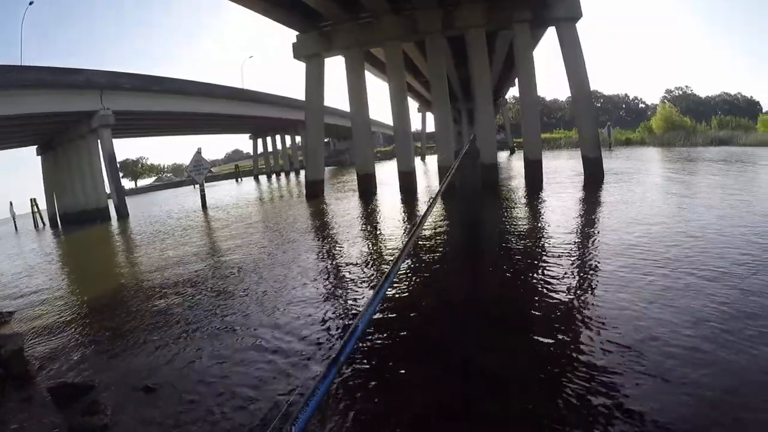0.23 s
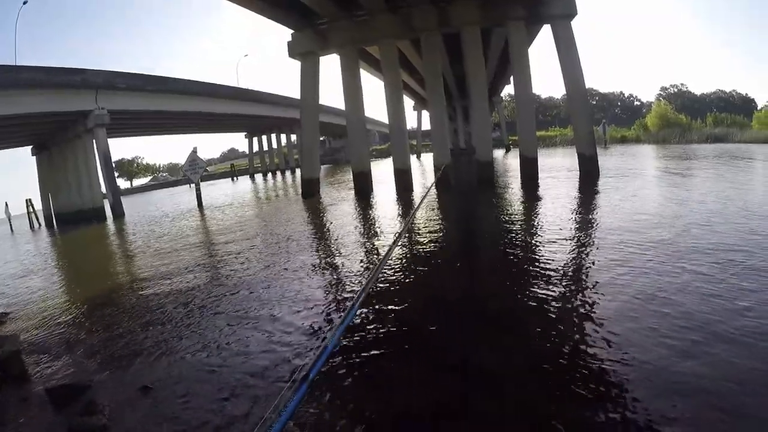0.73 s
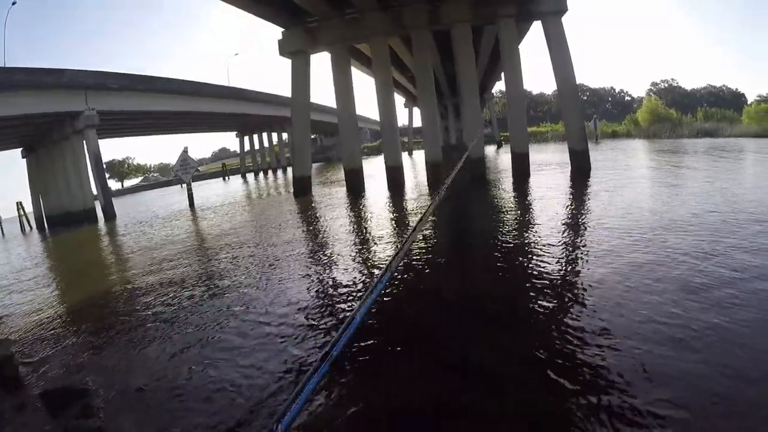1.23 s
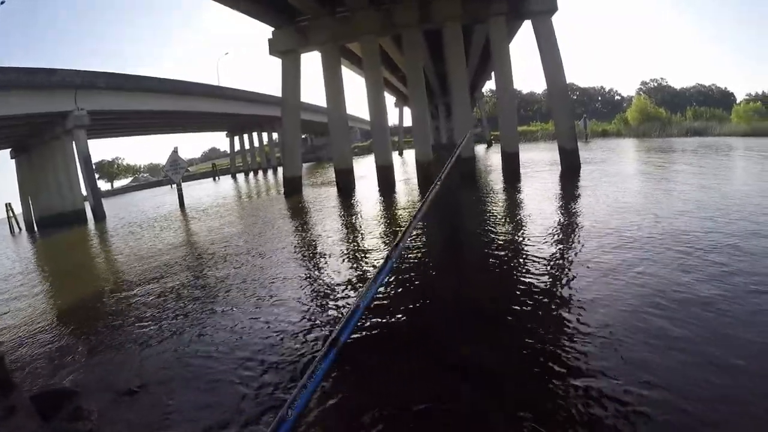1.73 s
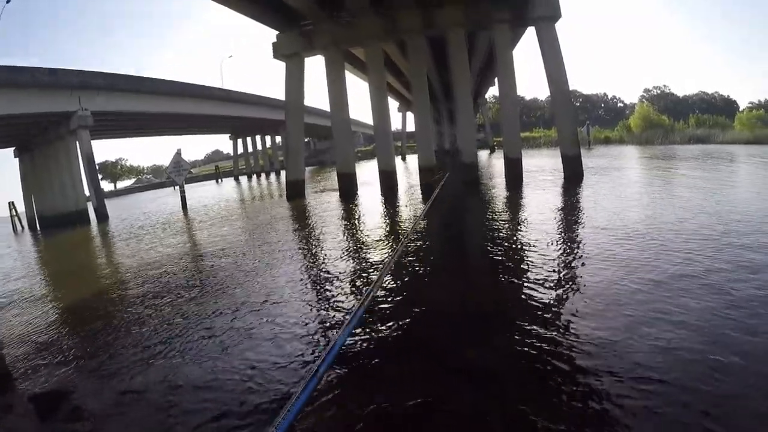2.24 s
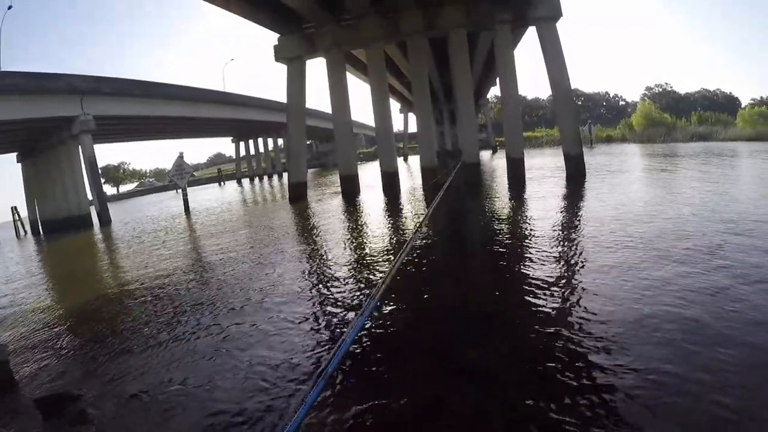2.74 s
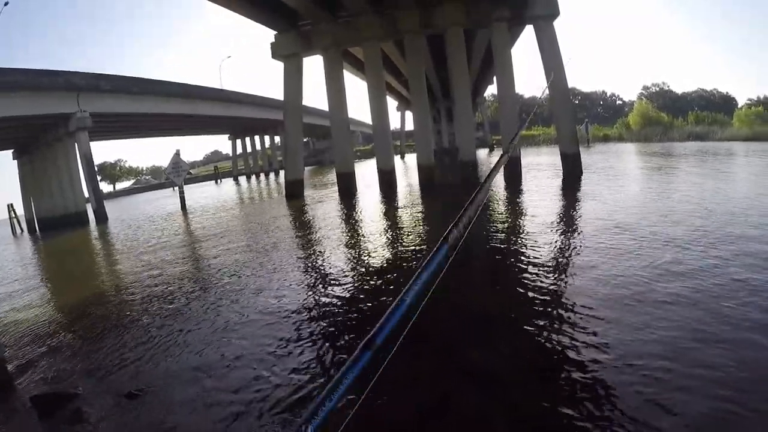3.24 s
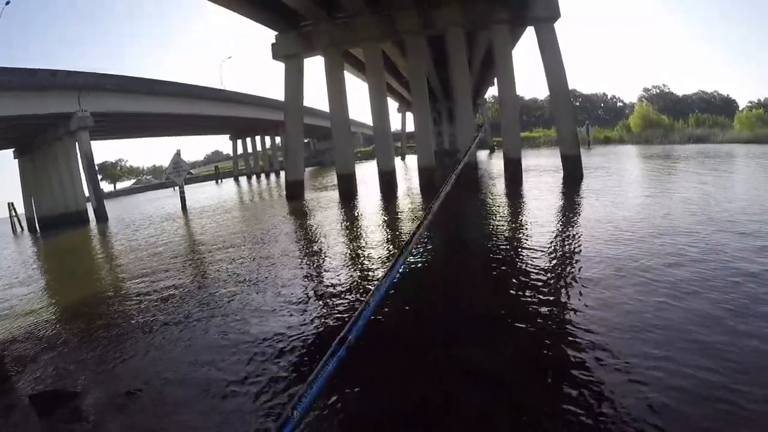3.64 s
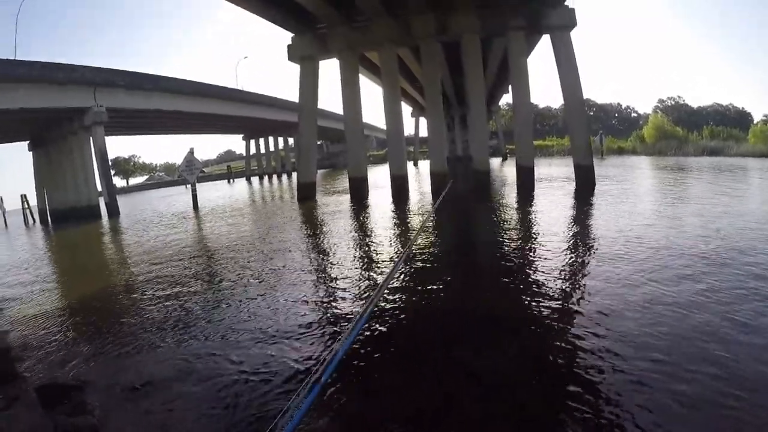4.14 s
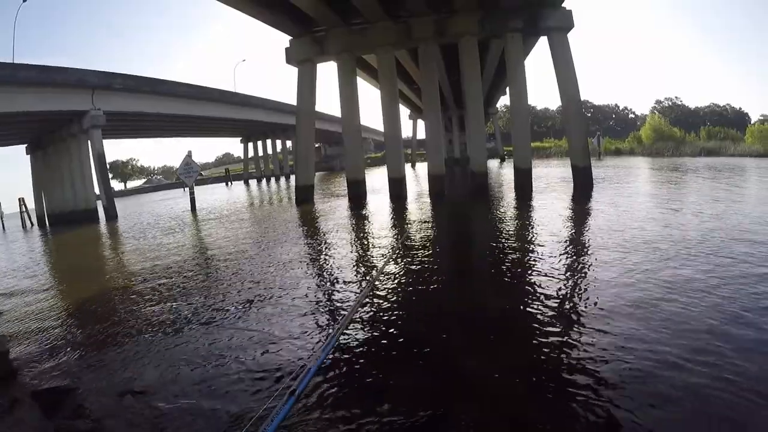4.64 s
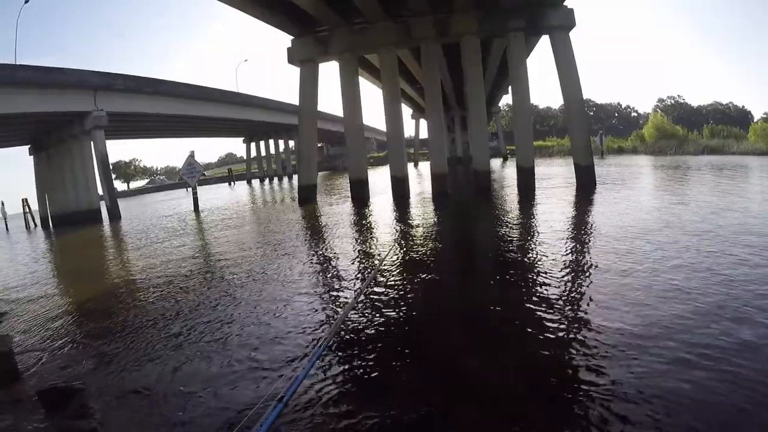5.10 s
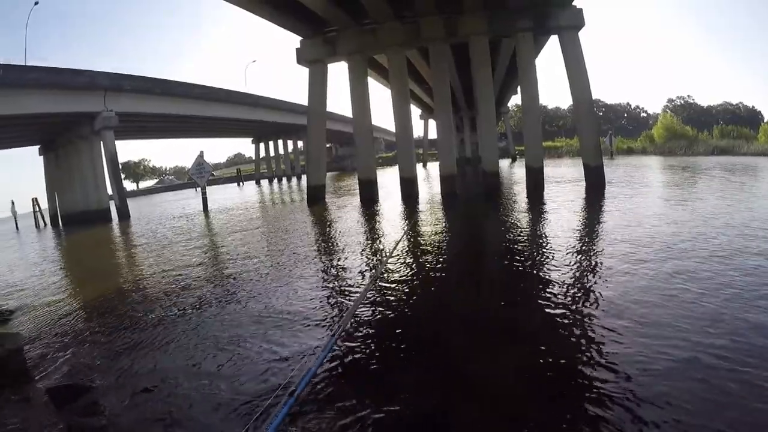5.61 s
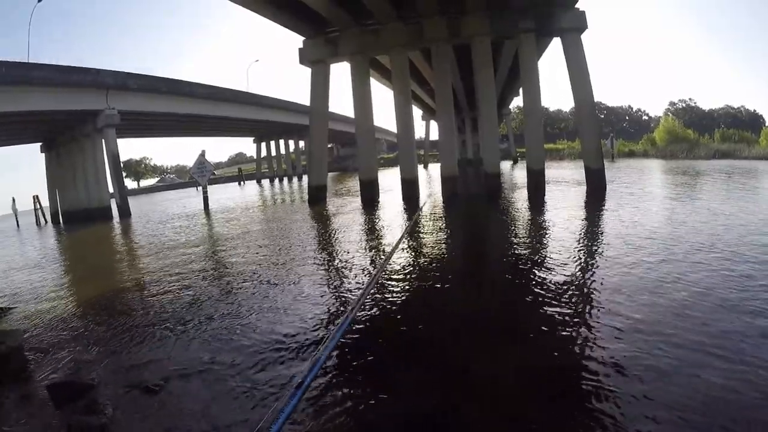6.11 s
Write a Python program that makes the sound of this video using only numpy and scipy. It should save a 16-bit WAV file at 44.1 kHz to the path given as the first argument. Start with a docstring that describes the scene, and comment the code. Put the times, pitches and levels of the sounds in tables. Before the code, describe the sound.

From under a concrete road bridge beside a river, a continuous low traffic rumble fills all six seconds or so, dark and slightly stronger on the left, with the deck humming around it and steady engine drones. Wind buffets the exposed stereo microphone in dull lumps: a strong thump at 0.2 s, another near 0.9, then weaker ones around 2, 3.2 and 5.3. A small wave plips and ticks at about 0.9 s. A vehicle's engine note grows, peaks near 2.9, drops in pitch by 3.6, then lifts and disappears by 4.5. A faint thin whine near 1.1 kHz softens after 3.2. Bubbles pop around 3.1 and 3.8, a fizzing splash comes at 4.3 to 4.7, and from 5.5 to the end lapping is busiest, with a round plop at 5.7 and climbing bloops near 6.2. Another low engine slowly nears; faint fluttering insect hiss persists.

```python
"""Traffic on a concrete road bridge rumbles overhead: shaped noise, a humming deck and gliding engine notes.
Below it by the river, a thin whine slowly fades and lumpy low noise makes gusts on two microphone ports.
Insects are narrow bands of hiss with a fast beat.
Small waves bring plips and bloops (sines that climb), ticks (short noise bursts) and a fizz of tiny grains."""
import sys
import numpy as np
from scipy import signal
from scipy.fft import rfft, irfft, next_fast_len
from scipy.io import wavfile
from scipy.ndimage import uniform_filter1d

SR = 44100
rng = np.random.default_rng(int(sys.argv[2]) if len(sys.argv) > 2 else 0)


def gain_from_decibels(decibels):
    """Convert decibel values to linear amplitude factors."""
    exponent = np.asarray(decibels, float) / 20
    return 10 ** exponent


def dump_mix(stems):
    """Bounce the given channels to the path in sys.argv[1] as a 16-bit WAV at rate SR."""
    frames = np.atleast_2d(stems).T  # one column per channel
    limited = np.clip(frames, -1, 1)  # hard clip at full scale
    pcm = np.round(limited * 32767).astype(np.int16)
    wavfile.write(sys.argv[1], SR, pcm)


N = 280476  # length in samples
TIME = np.arange(N) / SR  # seconds
LONG = next_fast_len(N, real=True)  # a length that transforms quickly
HZ = np.fft.rfftfreq(LONG, 1 / SR)

# How loud and near the traffic is.
# Each row: time in seconds, change of level in dB, change of brightness in dB.
TRAFFIC = [(0, -2, 3.5), (2.5, -1.5, 2), (5.3, -2, 5.5), (6.36, -1, 4)]
# How much stronger the left port hears. Each row: frequency in Hz, left over right in dB.
BALANCE_DB = [(60, 3.5), (950, 4), (2400, 1.5), (6000, -2.5), (15000, 2)]
# How far the left port is ahead. Each row: frequency in Hz, lead of the left in radians.
LEAD = [(60, .03), (1000, 0.25), (2400, 0.11), (3700, 3.16), (6100, 5.04), (9700, 7.8), (15000, 9)]


def evened(x):
    """Scales a sound to an rms of one."""
    return x / np.sqrt(np.mean(x ** 2, axis=-1, keepdims=True) + 1e-20)


def read(points, hz):
    """Reads a curve between its points, along a log-frequency axis."""
    f, value = np.transpose(points)
    return np.interp(np.log(hz + 1), np.log(f + 1), value)


def slow(rate):
    """Slow random wandering of rms one: sines from an eighth of rate up to rate, in Hz."""
    coarse = TIME[::256]
    waves = np.zeros(len(coarse))
    for f in np.geomspace(rate / 8, rate, num=16):
        waves += np.sin(2 * np.pi * (f * coarse + rng.random())) / np.sqrt(f)
    return np.interp(TIME, coarse, evened(waves))


def sides(pan_db):
    """Left and right gains for a level difference, left over right in dB."""
    return gain_from_decibels(np.array([pan_db / 2, -pan_db / 2]))


def spectra(count):
    """Random spectra of white noise on the long frequency grid."""
    shape = (count, len(HZ))
    return rng.standard_normal(shape) + 1j * rng.standard_normal(shape)


def ports(first, other):
    """One wide sound field at both ports: two unrelated spectra, shared more at low pitch, right one late."""
    # How alike the ports are. Each row: frequency in Hz, likeness from 0 to 1.
    likeness = [(60, 0.92), (300, 1), (800, 1), (1500, 0.51), (3000, 0.34), (15000, 0.044)]
    hz = np.linspace(0, SR / 2, first.shape[-1])
    same = np.clip(read(likeness, hz), 0, 1)
    blend = same * first + np.sqrt(1 - same ** 2) * other
    right = blend * np.exp(-1j * read(LEAD, hz))
    return np.array([first, right])


def near(x):
    """One clear source at both ports: the same sound, shifted in phase and balanced by frequency."""
    left = rfft(x, LONG)
    right = left * np.exp(-1j * read(LEAD, HZ))
    pair = np.array([left, right]) * sides(read(BALANCE_DB, HZ))
    return irfft(pair, LONG)[:, :N]


def narrow(modes):
    """Noise ringing in steep resonances (Hz, width Hz, rms dB), at both ports."""
    power = np.zeros(len(HZ))
    for hz, width, db in modes:
        peak = 1 / (1 + (2 * (HZ - hz) / width) ** 2) ** 2
        power += gain_from_decibels(db) ** 2 * peak ** 2 / np.sum(peak ** 2)
    pair = ports(*spectra(count=2)) * np.sqrt(power) * LONG / 2
    return irfft(pair, LONG)[:, :N]


def tones(lines, drift_hz, waver_db):
    """Sines (Hz, dB) that drift in pitch and waver in strength."""
    out = np.zeros(N)
    for hz, db in lines:
        strength = np.sqrt(2) * gain_from_decibels(db + waver_db * slow(4.6))
        turns = np.cumsum(hz + drift_hz * slow(4)) / SR
        out += strength * np.sin(2 * np.pi * turns)
    return out


def roar():
    """Tyre and engine roar: wide noise in drifting patches; nearer vehicles add treble."""
    # Tone colour of the roar. Each row: frequency in Hz, relative level in dB per Hz.
    colour = [(35, -32), (60, -8.5), (100, -3), (300, -5.5), (500, -17.5), (780, -28.5), (1200, -31),
              (1900, -38.5), (3000, -38.5), (6000, -48.5), (8000, -53), (10500, -58.5), (15500, -78)]
    frames, hz = N // 256 + 5, np.fft.rfftfreq(1024, 1 / SR)
    a, b, c, d, patches = np.moveaxis(rng.standard_normal((frames, 513, 5)), 2, 0)
    # smooth over time, then over frequency
    patches = uniform_filter1d(uniform_filter1d(patches, 10, axis=0), 8, axis=1)
    s, _, bright_db = np.transpose(TRAFFIC)
    bright_db = np.interp(np.arange(frames) * 256 / SR, s, bright_db)
    # brightness grows above 350 Hz and eases off above 4500 Hz
    share = np.clip(np.log2(hz / 350 + 1e-9), 0, 1) / (1 + (hz / 4500) ** 2)
    shape_db = read(colour, hz) + 1.63 * patches / patches.std() + np.outer(bright_db, share)
    balance = sides(read(BALANCE_DB, hz))[:, None]
    z = ports(a + 1j * b, c + 1j * d) * gain_from_decibels(shape_db) * balance
    x = signal.istft(z.swapaxes(1, 2), nperseg=1024, noverlap=768)[1][:, :N]
    return gain_from_decibels(-24.5) * x / x.std()


def deck():
    """Passing wheels shake the concrete: noise in its broad resonances, around a humming set of tones."""
    # Broad resonances of deck and girders. Each row: frequency in Hz, width in Hz, level in dB.
    resonances = [(105.2, 46, -31), (288, 42, -41.5)]
    # Humming tones in the deck. Each row: frequency in Hz, level in dB.
    hum = [(106, -29.5), (171, -30), (352, -41.5)]
    shaking = narrow(resonances) * sides(1.8)[:, None]
    return shaking + near(tones(hum, drift_hz=0.77, waver_db=0.0))


def engines():
    """Engine notes: sines that follow the speed and waver a little; the drone sounds at multiples."""
    # A vehicle that passes, slows and pulls away. Each row: time in seconds, pitch in Hz, level in dB.
    passing = [(1, 309.6, -50), (2.2, 301.8, -40), (2.902, 294.6, -32.5), (3.602, 264.5, -45),
               (4.25, 288, -38), (4.5, 293, -58)]
    # A low note drawing nearer. Each row: time in seconds, pitch in Hz, level in dB.
    nearing = [(0, 116.5, -41), (4, 115.4, -35.5), (6.36, 118.3, -28.5)]
    # A steadily loaded engine. Each row: time in seconds, base pitch in Hz.
    drone = [(0, 76.7), (3.7, 77), (4, 78.4), (4.9, 78.3), (5.2, 76.8), (6.36, 77.2)]
    # Its audible tones. Each entry: multiple of the base pitch, level in dB.
    multiples = {3: -32.5, 4: -33}
    moving = []
    for path in (passing, nearing):
        s, hz, db = np.transpose(path)
        moving.append((np.interp(TIME, s, hz), np.interp(TIME, s, db)))
    base_hz = np.interp(TIME, *np.transpose(drone))
    steady = [(k * base_hz, db) for k, db in multiples.items()]
    sound = tones(moving, drift_hz=0.49, waver_db=-1.0) + tones(steady, drift_hz=1.1, waver_db=1.1)
    return near(sound)


def whine():
    """A close thin whine: wavering sines in a fuzzy band of noise that slowly fade."""
    # Its thin tones. Each row: frequency in Hz, level in dB.
    thin = [(1027, -58), (1098, -57), (1125, -53)]
    # The fuzzy band around them. Each row: frequency in Hz, width in Hz, level in dB.
    fuzz = [(1144, 140, -55)]
    # How it fades. Each row: time in seconds, change of level in dB.
    fade = [(0, 0), (3.2, 0), (3.8, -6), (6.36, -8)]
    sound = tones(thin, drift_hz=1.77, waver_db=3.0) + narrow(fuzz)[0]
    return near(sound * gain_from_decibels(np.interp(TIME, *np.transpose(fade))))


def wind():
    """Gusts on the ports: lumpy pressure, mostly unrelated at the two, pushing harder than it pulls."""
    # The gusts. Each row: time in seconds, level in dB of both ports averaged into one, left over right in dB.
    gusts = [(0.0, -22.5, 35), (0.18, -10, -2.5), (0.28, -22, -12.5), (0.85, -14.5, 7.5), (1.17, -18, 14.5),
             (1.74, -19.5, 13.5), (1.84, -28.5, -3), (2.04, -16.5, 9.5), (2.36, -29, 18), (2.6, -21, 7),
             (2.78, -29, 3), (3.2, -18.5, 6), (4.0, -28, 21), (4.42, -23, 21), (4.57, -31.5, 1),
             (5.28, -18, 10), (5.501, -26, -5), (6.36, -33, 21)]
    # Tone colour of the buffeting. Each row: frequency in Hz, relative level in dB per Hz.
    colour = [(8, -26), (18, 7.5), (32, -0.5), (60, -3.5), (120, -18), (260, -27.5), (700, -97)]
    s, level_db, pan_db = np.transpose(gusts)
    push = evened(irfft(spectra(count=2) * gain_from_decibels(read(colour, HZ)), LONG)[:, :N])
    push = push + 0.082 * push[::-1]  # a little of each port's buffeting is shared with the other
    push = push * gain_from_decibels(0.79 * np.array([slow(11), slow(4.1)]))
    push = push + 0.098 * (push ** 2 - 1)  # strengthens the pushes
    left, right = sides(np.interp(TIME, s, pan_db))
    balance = [left, right] / (np.hypot(left, right) / 2)
    return evened(push) * gain_from_decibels(np.interp(TIME, s, level_db)) * balance


def insects():
    """Many singers blur into bands of hiss; the nearest beats through."""
    # The choruses. Each row: frequency in Hz, width in Hz, level in dB before the beating,
    # beat depth from 0 to 1, left over right in dB.
    choruses = [(9730, 1000, -56.5, 0.45, -8), (9470, 1970, -58, 0.11, -4), (6850, 320, -65, 0, 1.5)]
    beats_per_s = 69.2
    out = np.zeros((2, N))
    for hz, width, db, depth, pan_db in choruses:
        turns = beats_per_s * TIME + 0.12 * slow(1.8)  # the beat is slightly uneven
        beat = 1 + np.clip(depth, 0, 1) * np.cos(2 * np.pi * turns)
        waver = gain_from_decibels(0.12 * slow(0.16))
        out += narrow([(hz, width, db)]) * beat * waver * sides(pan_db)[:, None]
    return out


def lapping():
    """Strength of the fizz: each wave rises fast and drains slowly over calm ripples."""
    # Small waves breaking on the bank. Each row: time of the crest in seconds, level of the fizz in dB.
    crests = [(.25, -47), (.94, -39.5), (1.73, -47.5), (3.0, -48), (4.34, -38), (4.72, -42.5), (5.1, -47),
              (5.569, -39), (5.7, -38), (6.05, -39.5), (6.24, -38.5)]
    rise_db_per_s, fall_db_per_s, calm_db = 161, 63, -61.5
    s, db = np.transpose(crests)[:, :, None]
    coarse = TIME[::256]
    since = coarse - s
    waves = gain_from_decibels(db + np.where(since < 0, rise_db_per_s, -fall_db_per_s) * since)
    strength = np.sqrt(gain_from_decibels(calm_db) ** 2 + (waves ** 2).sum(axis=0))
    return np.interp(TIME, coarse, strength)


def plip(hz, t60, rise):
    """A bubble: a sine dying 60 dB in t60 seconds, its pitch climbing by twice the share rise meanwhile."""
    t = np.arange(4096) / SR
    wave = np.sin(2 * np.pi * hz * t * (1 + rise * t / t60))
    soft_start = 1 - np.exp(-t / t60 / 0.042)
    return wave * gain_from_decibels(-60 * t / t60) * soft_start


def fizz():
    """A random patter of tiny bubbles and snaps, in clumps; a few are larger."""
    clumps = gain_from_decibels(4.0 * slow(40))
    happens = rng.random(N) < 2000 * clumps / SR  # 2000 grains a second, thinned or crowded by the clumps
    size = gain_from_decibels(3.6 * np.minimum(rng.exponential(1, N), 4)) * happens
    kind, out = rng.integers(0, 32, N), np.zeros(N)
    for k, hz in enumerate(np.geomspace(750, 11000, num=32)):
        cycles = 26 if k % 2 else 8  # bubbles ring, snaps do not
        grain = plip(hz, cycles / hz, 0.15)[:1024]
        grain = grain * gain_from_decibels(-3 * np.log2(hz / 3000))  # 3 dB weaker per octave upwards
        out += signal.oaconvolve(size * (kind == k), grain)[:N]
    return evened(out) * lapping()


def tick(hz, octaves, lag_us, noise):
    """A bursting droplet: a brief noise with a weak tail, coloured around one pitch, heavier below it."""
    t, f = np.arange(1024) / SR, np.fft.rfftfreq(1024, 1 / SR)
    decay = np.exp(-t / 0.0012) + 0.16 * np.exp(-t / 0.007)
    burst = np.roll(noise * decay, 64)  # leaves room ahead of the burst
    above = np.log2(f / hz + 1e-9)  # octaves above the pitch
    snap = rfft(burst) * np.exp(-0.25 * (above / octaves) ** 2) * gain_from_decibels(-4 * above)
    left = snap * np.exp(-2j * np.pi * f * lag_us / 10 ** 6)
    pair = irfft([left, snap]) * sides(-2.8)[:, None]
    return pair / abs(irfft(snap)).max()


def bloop(hz, length, octaves):
    """A shrinking pocket of air: a broken sine that climbs ever faster."""
    u = np.arange(0, length, 1 / SR) / length  # from 0 to 1 over the sound
    turns = np.cumsum(hz * 2 ** (octaves * u ** 1.7)) / SR
    broken = 1 + 0.25 * evened(uniform_filter1d(rng.standard_normal(len(u)), size=150))
    fade = gain_from_decibels(-8.5 * u) * np.sqrt(np.sin(np.pi * u))
    return np.sin(2 * np.pi * turns) * broken * fade


def add(mix, s, sound):
    """Adds a short sound into the mix, starting at s seconds."""
    part = mix[round(s * SR):][:len(sound)]
    part += sound[:len(part)]


def water():
    """Plips, bloops and ticks among the fizz, with a second, wide-sounding fizz behind them."""
    # Bubbles left by small waves. Each row: start in seconds, level in dB, pitch in Hz,
    # time to die by 60 dB in seconds.
    plips = [(0.281, -27, 960, 0.061), (0.917, -17, 1200, 0.0079), (0.967, -34, 890, 0.03),
             (.992, -32, 2200, .015), (3.078, -30, 1490, 0.013), (3.717, -27, 1700, 0.02),
             (3.808, -32.5, 2550, 0.024), (3.856, -21, 1430, 0.031), (4.337, -28, 2560, 0.014),
             (4.401, -21.5, 836, 0.012), (4.611, -21.5, 1220, 0.023), (5.553, -31, 2030, .02),
             (5.565, -27.5, 1120, 0.025), (5.567, -30, 2600, .018), (5.669, -20.5, 2460, 0.022),
             (5.684, -24, 4250, .012), (5.705, -11.5, 736, 0.027), (5.92, -26, 1350, 0.044),
             (6.006, -22.5, 930, 0.045), (6.031, -21, 1204, 0.076), (6.091, -22, 1350, 0.018),
             (6.11, -33, 2360, 0.027), (6.159, -37, 2450, .022), (6.344, -29, 1570, .022)]
    # Air pockets filling with water. Each row: start in seconds, level in dB, first pitch in Hz,
    # length in seconds, climb in octaves.
    bloops = [(3.053, -29.5, 700, 0.04, 1.05), (5.609, -31, 1310, 0.018, 0.28), (6.19, -25, 577, .04, 0.93),
              (6.238, -34, 942, 0.026, .55)]
    # Droplets bursting along the bank. Each row: time in seconds, peak in dB before the left-right balance,
    # middle pitch in Hz, spread in octaves.
    ticks = [(0.403, -19, 5650, 0.17), (0.5812, -33, 3830, 0.14), (0.917, -37, 7500, 0.46),
             (0.924, -26.5, 4700, 0.35), (0.9562, -22, 4500, 0.59), (2.949, -31, 2100, 0.29),
             (2.984, -35.5, 2420, 0.15), (3.712, -33, 7860, 0.22), (3.978, -29, 4670, 0.099),
             (4.3224, -22.5, 6000, 0.47), (4.3395, -19, 6300, 0.18), (4.377, -24, 1100, 0.88),
             (4.469, -33, 5000, 0.43), (4.84, -30, 7600, 0.22), (5.1496, -26, 6000, 0.46),
             (5.325, -34, 6000, 0.28), (5.496, -23, 5240, 0.29), (5.7035, -28.5, 2600, 0.4),
             (5.8663, -27.5, 3500, 0.38), (6.031, -32, 8000, 0.35), (6.068, -33.5, 3670, 0.089),
             (6.176, -33, 3100, 0.1), (6.2598, -27.5, 2800, 0.65), (6.302, -24, 2500, 0.29)]
    # Where they burst. Each row: time in seconds, lag of the left port in microseconds.
    burst_side = [(.4, -94), (.95, 164), (3.7, -93), (5.3, -80), (6.2, 42)]
    mix, bursts = fizz(), np.zeros((N, 2))
    for s, db, hz, t60 in plips:
        add(mix, s, gain_from_decibels(db) * plip(hz, t60, 0.027))
    for s, db, hz, length, octaves in bloops:
        add(mix, s, gain_from_decibels(db) * bloop(hz, length, octaves))
    noises = rng.standard_normal((len(ticks), 1024))
    for (s, db, hz, octaves), noise in zip(ticks, noises):
        lag_us = np.interp(s, *np.transpose(burst_side))
        add(bursts, s - 64 / SR, gain_from_decibels(db) * tick(hz, octaves, lag_us, noise).T)
    second = fizz()
    wide = np.array([second, np.roll(second, 300)])  # 300 samples apart at the two ports, so it sounds wide
    return near(mix) + bursts.T + gain_from_decibels(-5.0) * wide


def scene():
    """Traffic sounds that swell together, plus whine, wind, insects and water."""
    s, level_db, _ = np.transpose(TRAFFIC)
    swell = gain_from_decibels(np.interp(TIME, s, level_db))
    traffic = swell * (roar() + deck() + engines())
    return traffic + whine() + wind() + insects() + water()


def top_cut(x):
    """Nothing passes above the cut-off."""
    return signal.sosfilt(signal.butter(12, 15100, fs=SR, output="sos"), x)


def record(dry):
    """Clips the mix hard at full scale and finishes it."""
    mix = np.clip(dry, -1, 1)
    return top_cut(mix)


dry = scene()
out = record(dry)
dump_mix(out)
```